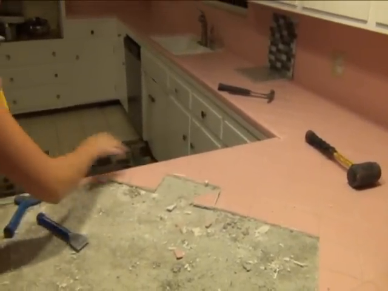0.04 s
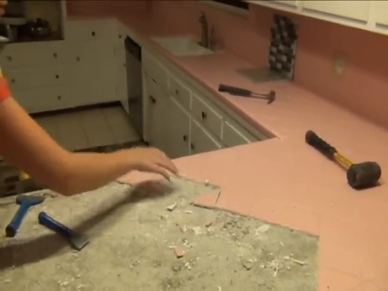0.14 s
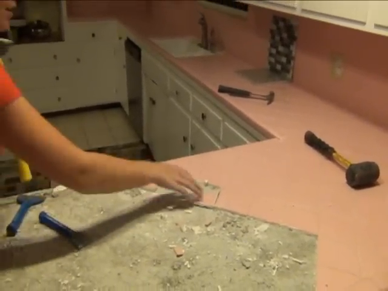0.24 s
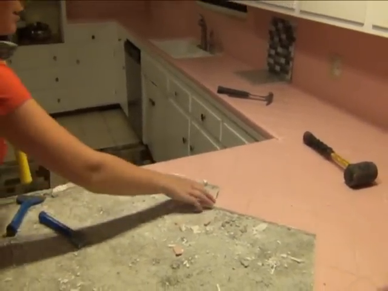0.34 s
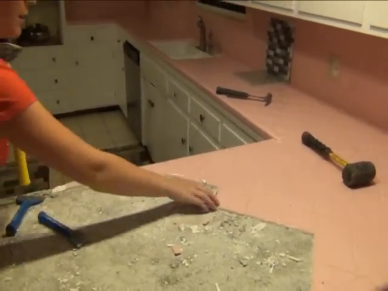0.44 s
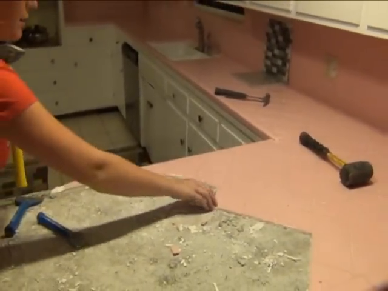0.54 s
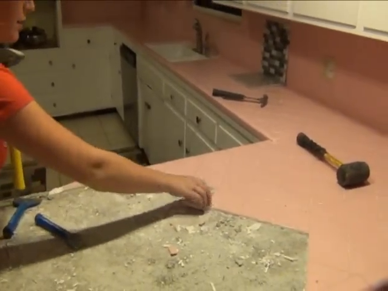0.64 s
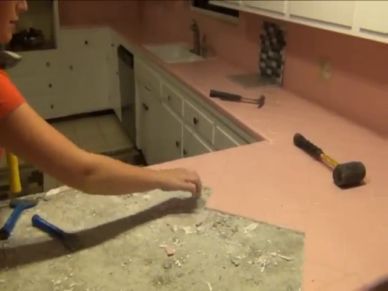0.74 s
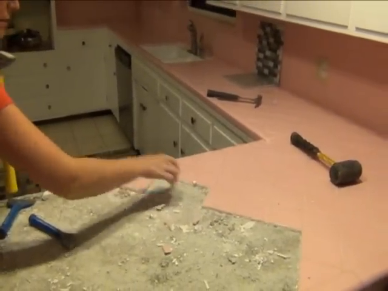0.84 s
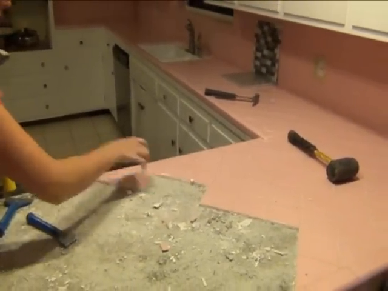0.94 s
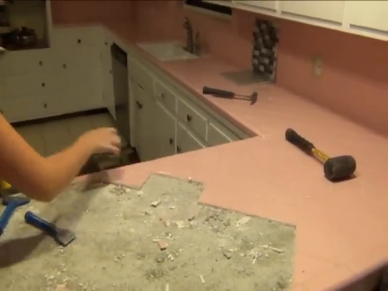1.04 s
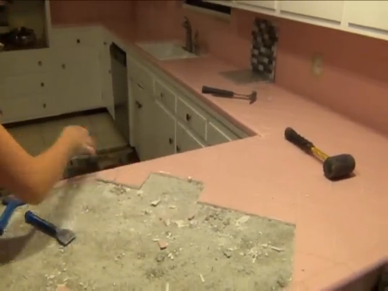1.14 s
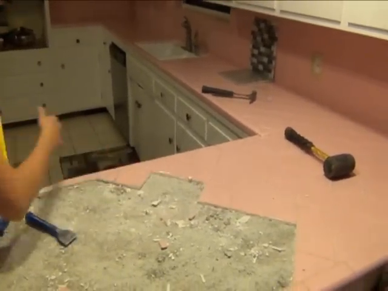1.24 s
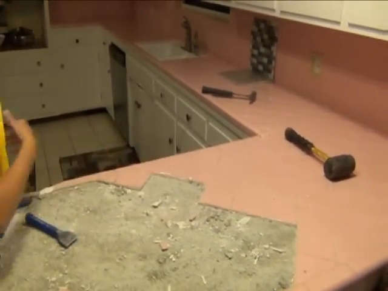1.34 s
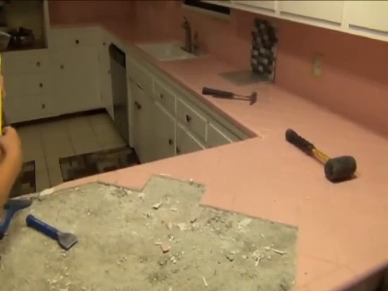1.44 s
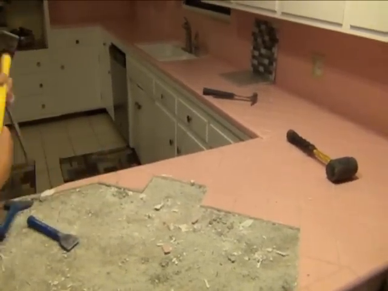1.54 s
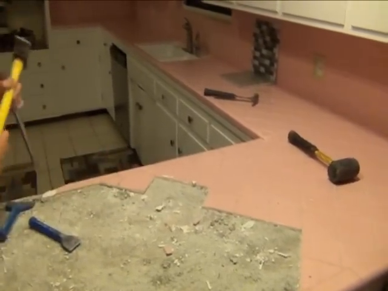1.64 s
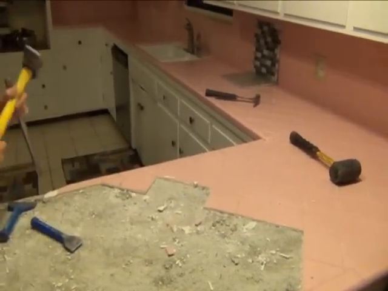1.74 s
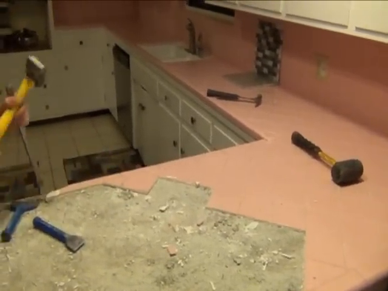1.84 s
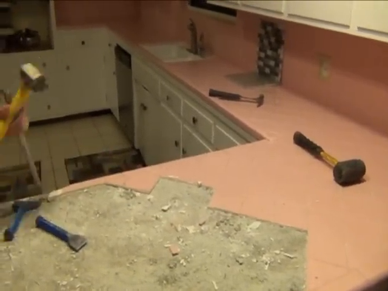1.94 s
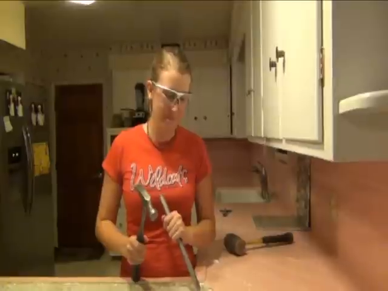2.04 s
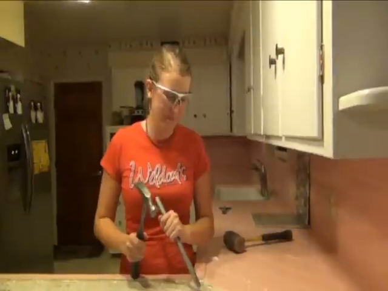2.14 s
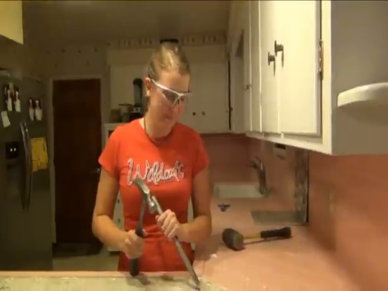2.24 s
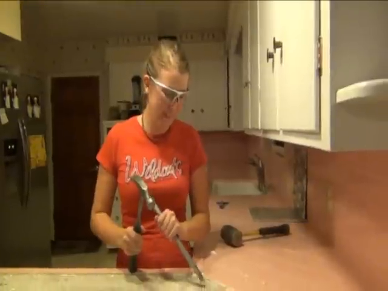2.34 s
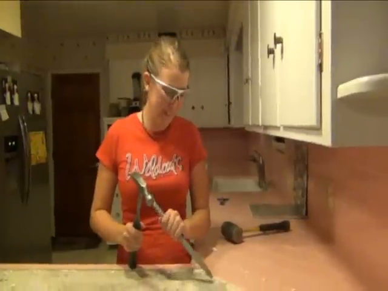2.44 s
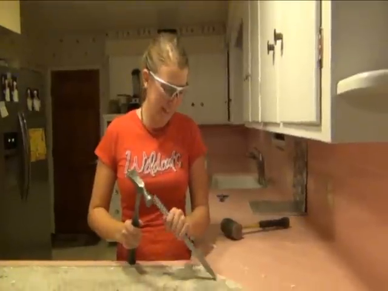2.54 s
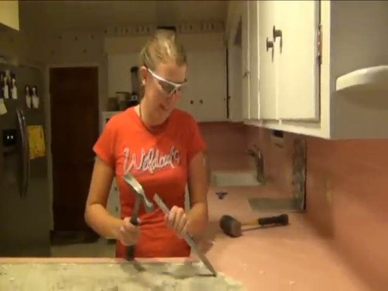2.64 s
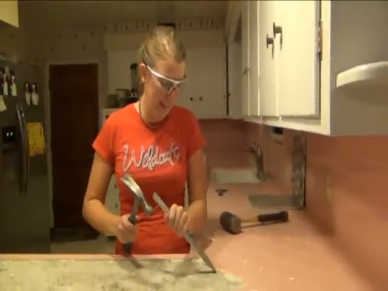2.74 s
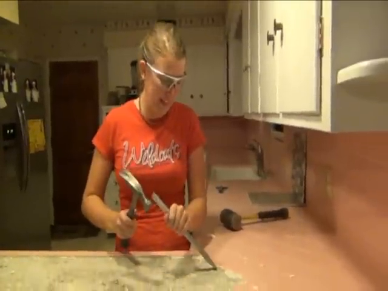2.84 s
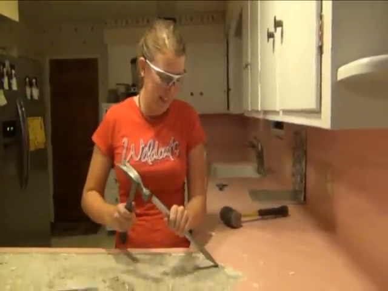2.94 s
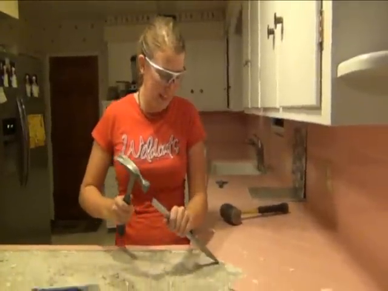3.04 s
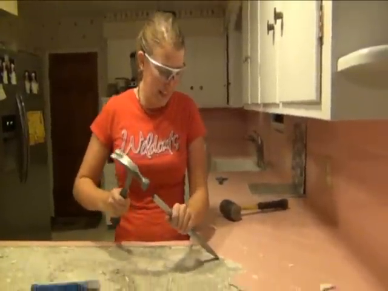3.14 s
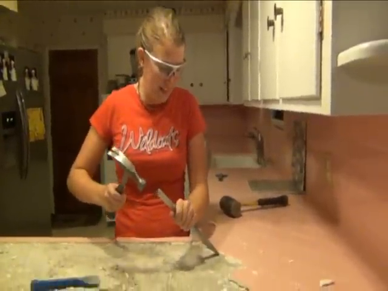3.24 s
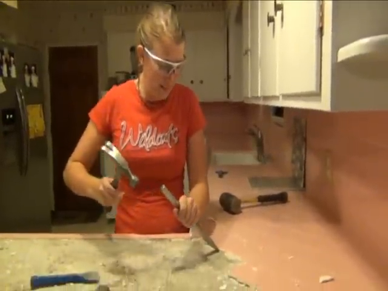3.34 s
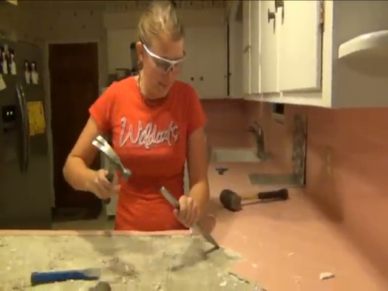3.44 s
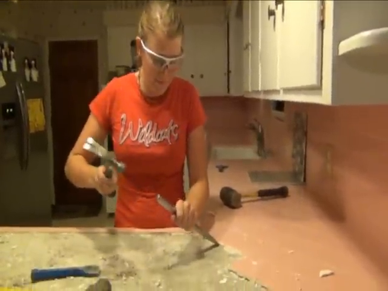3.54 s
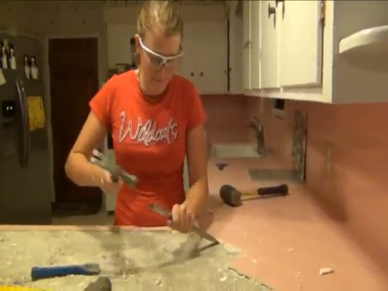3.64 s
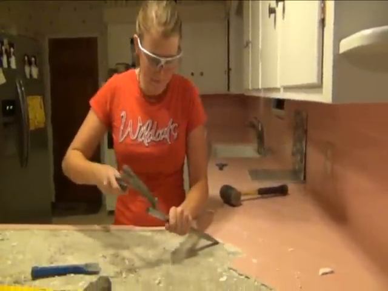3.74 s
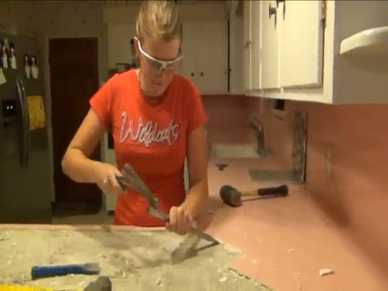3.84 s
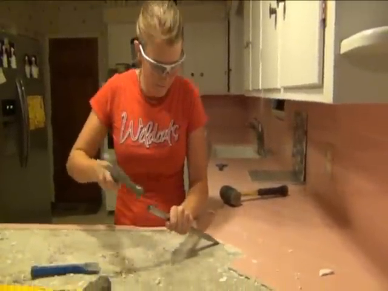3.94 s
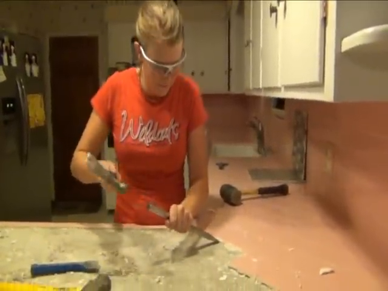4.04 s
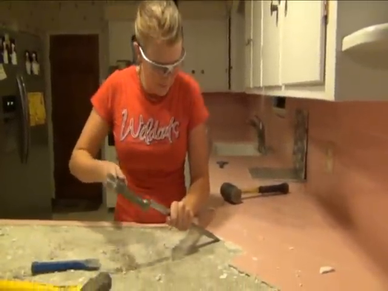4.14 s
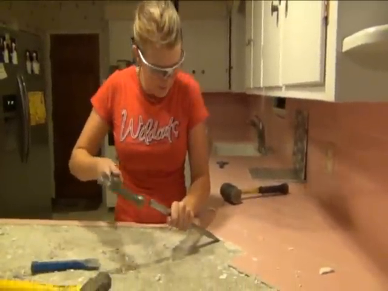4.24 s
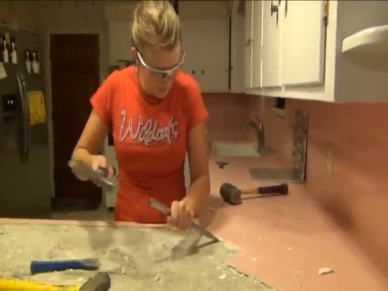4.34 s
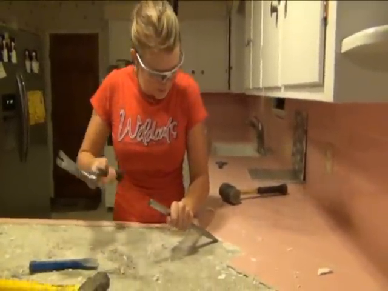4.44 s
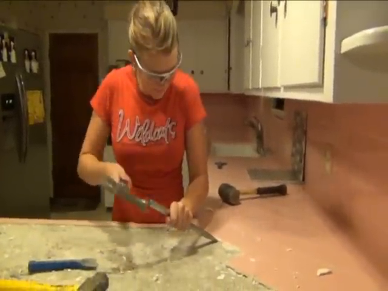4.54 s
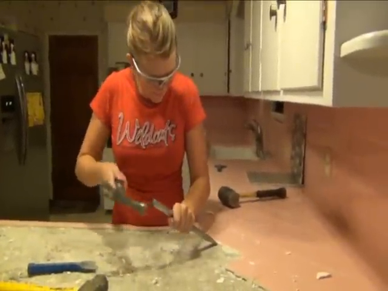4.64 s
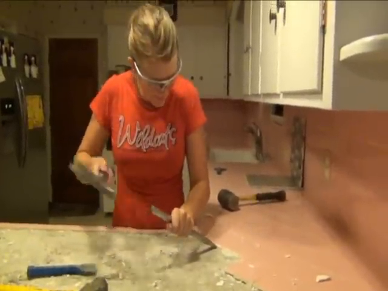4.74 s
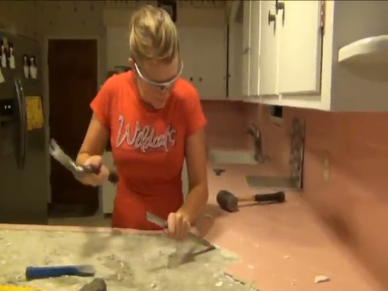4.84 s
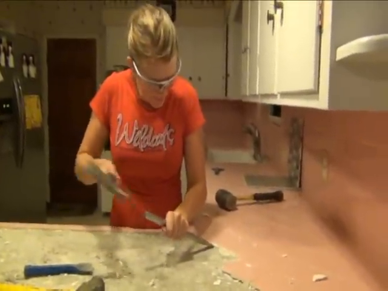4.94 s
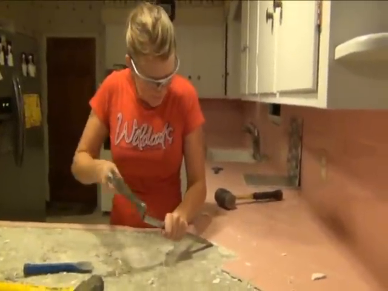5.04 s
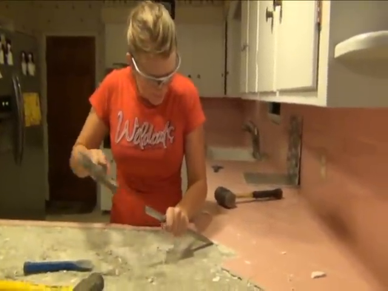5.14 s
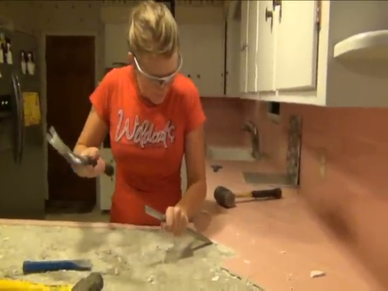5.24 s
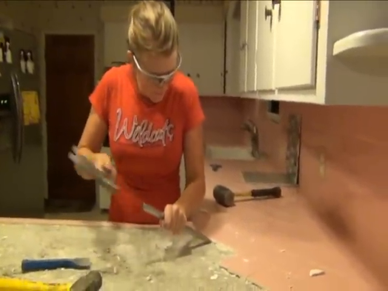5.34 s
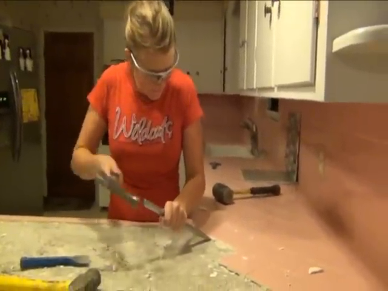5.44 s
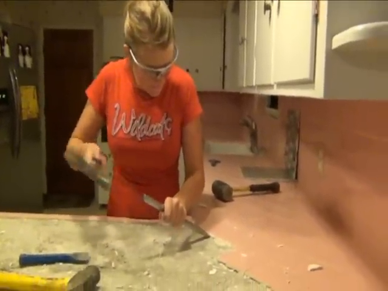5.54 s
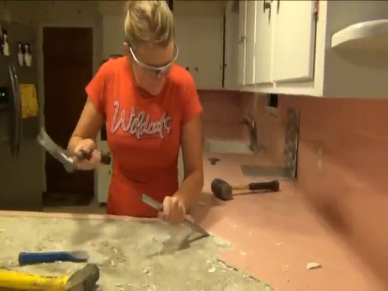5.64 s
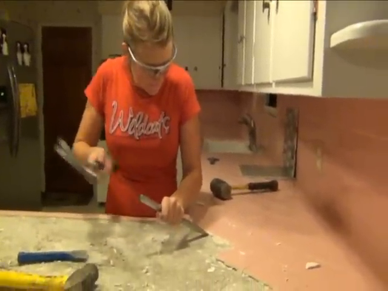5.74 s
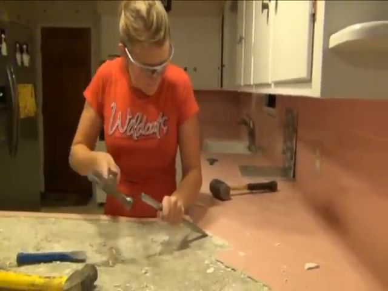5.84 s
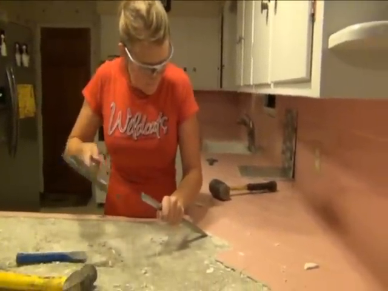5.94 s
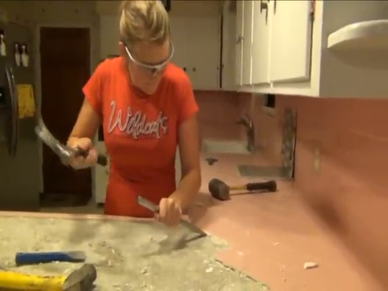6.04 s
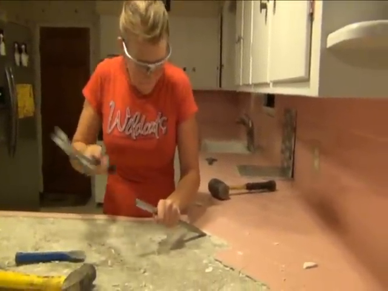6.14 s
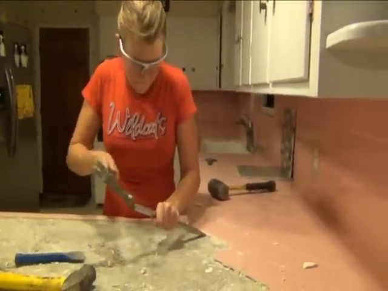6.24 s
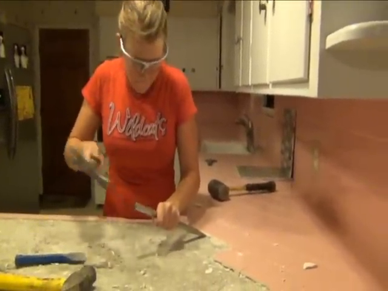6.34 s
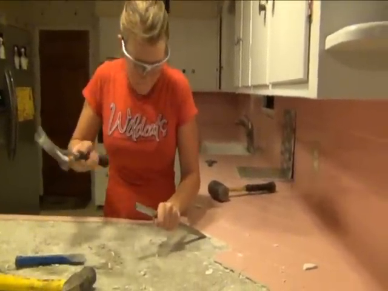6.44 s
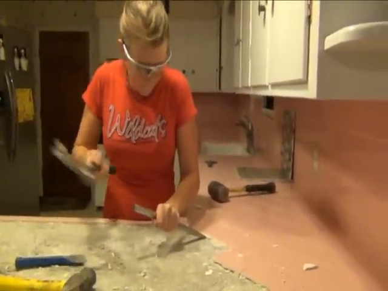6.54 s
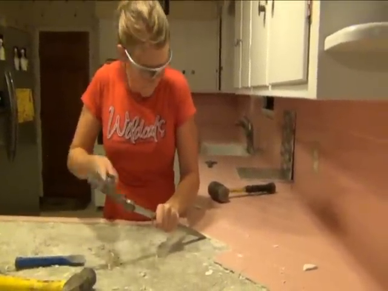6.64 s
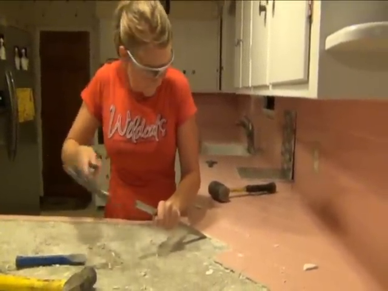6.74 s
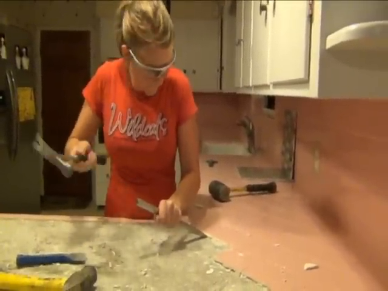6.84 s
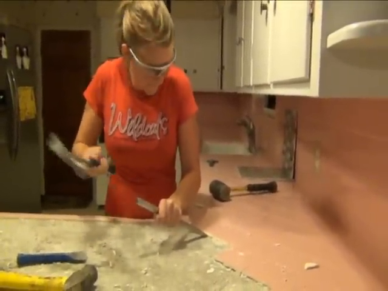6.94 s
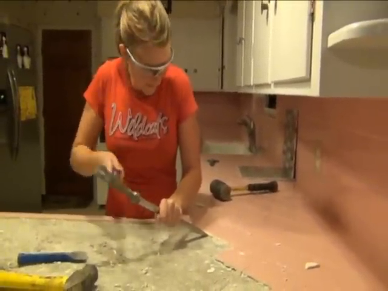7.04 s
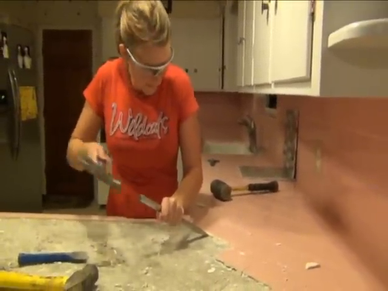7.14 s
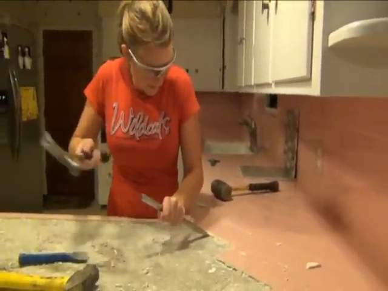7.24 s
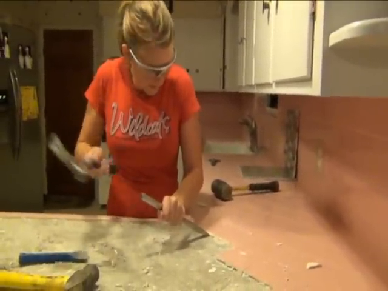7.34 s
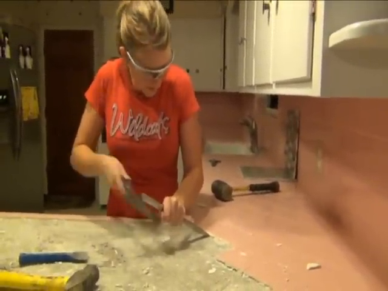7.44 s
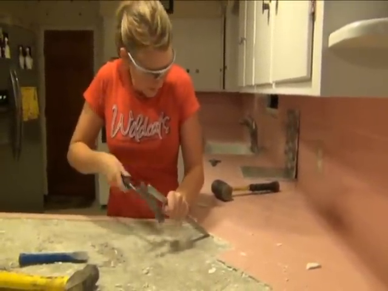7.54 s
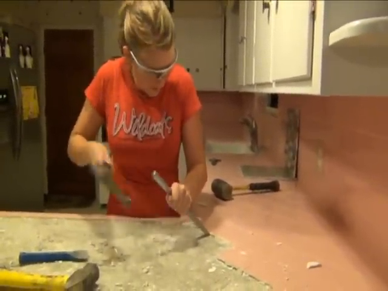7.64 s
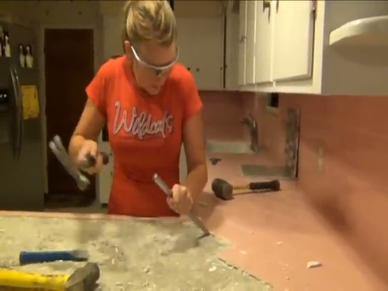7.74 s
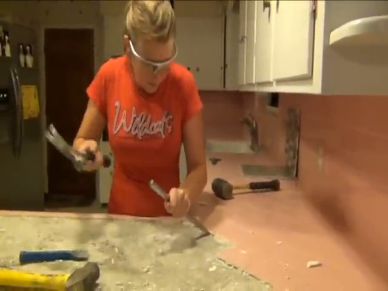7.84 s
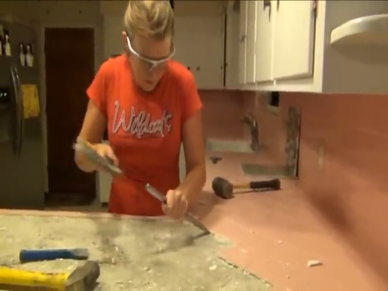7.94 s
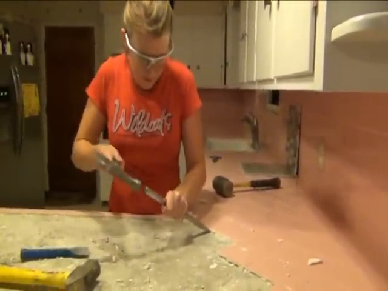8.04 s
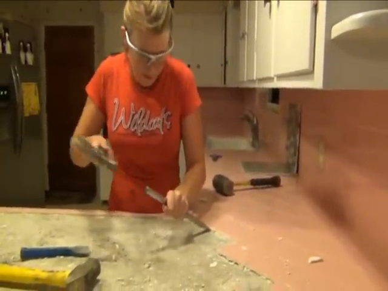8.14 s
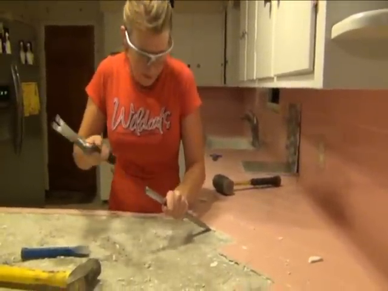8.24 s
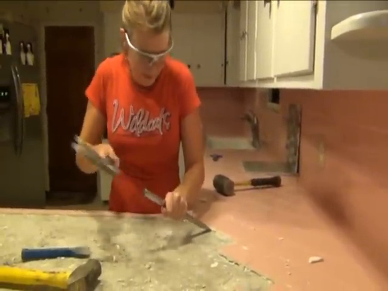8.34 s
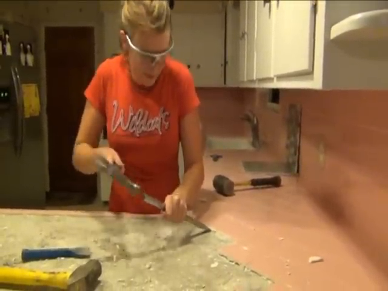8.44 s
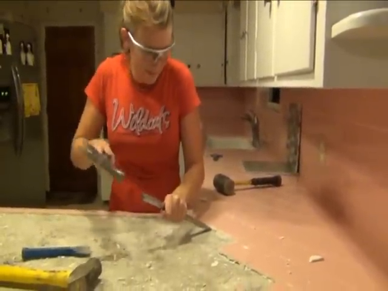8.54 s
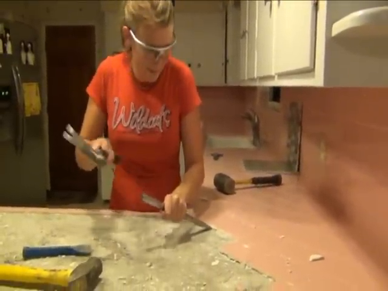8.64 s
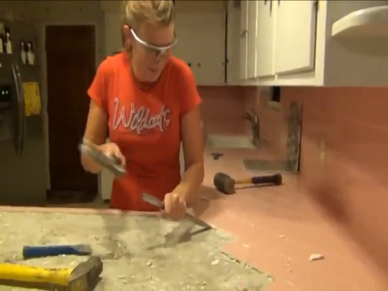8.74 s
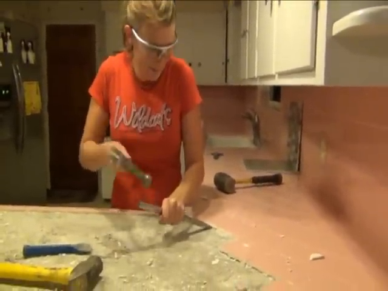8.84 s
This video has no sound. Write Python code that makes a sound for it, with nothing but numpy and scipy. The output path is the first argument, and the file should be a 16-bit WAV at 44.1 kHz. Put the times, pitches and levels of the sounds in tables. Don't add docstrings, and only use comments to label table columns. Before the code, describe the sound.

A small hard-walled kitchen with steady hum and hiss, grit settling at the start. At 0.4 s a tile shard lands with a loud bright ceramic clack and short room roar; faint clinks follow around 0.75-0.95 s, then a second, fuller smack at 1.7 s, with a tiny rocking tick at 2.0. At 2.1 s the background abruptly changes to a lower, darker hum. A chisel tip knocks the counter dully at 2.7 s, with faint steely touches and hand rustle until 3.7, then a firm tap at 3.9 and a softer rebound. From 4.3 s a hammer strikes the chisel about every 0.4 s, loud and compressed: early blows ring high over a counter thud and hollow cabinet boom; from 6.4 s they are choked and duller. A weaker glancing double hit comes at 7.6 s, then two last deadened blows at 8.2 and 8.55 s, reverberation dying away.

```python
import sys
import numpy as np
from scipy import signal
from scipy.io import wavfile
from scipy.ndimage import uniform_filter1d

SR = 44100
rng = np.random.default_rng(int(sys.argv[2]) if len(sys.argv) > 2 else 0)


def how_loud(loudness_db):
    steps = np.asarray(loudness_db, float) / 20
    return 10 ** steps


def log_audio(samples):
    frames = np.atleast_2d(samples).T
    limited = np.clip(frames, -1, 1)
    pcm = np.round(limited * 32767).astype(np.int16)
    wavfile.write(sys.argv[1], SR, pcm)


N = 392049
CHANGE_S = 2.103

# frequency in Hz, level in dB per Hz.
HUM_BEFORE = [(12, -58.5), (20, -22), (170, -7), (190, -4), (384, -10.5), (416, -4), (517, -11.5),
              (1100, -17.5), (2630, -28.5), (2850, -27.5), (6780, -33), (12000, -32), (13000, -30)]
HUM_AFTER = [(12, -63), (20, -47), (48, -4.5), (96, -10), (149, 0.5), (185, -13), (285, -11.5),
             (439, -19.5), (531, -18.5), (819, -26.5), (1570, -30), (1800, -31), (3740, -41.5),
             (12000, -47), (13000, -59)]
# frequency in Hz, likeness from 0 to 1.
HUM_LIKENESS = [(60, 1), (230, 1), (870, 0.77), (3320, 0.89), (12600, 1)]
# start in seconds, end in seconds, ease in seconds.
PLACING = (3.2, 5.5, 0.43)
# frequency in Hz, t60 in seconds.
KITCHEN_DECAY = [(100, 0.65), (300, 0.5), (1000, 0.46), (3000, 0.48), (6000, 0.43), (12000, 0.3)]
# frequency in Hz, likeness from 0 to 1.
ROOM_LIKENESS = [(60, 0.98), (170, 1), (510, 0.82), (1490, 0.85), (3000, 0.75), (4500, 1), (9000, 1),
                 (12600, 1)]

# start in seconds, force in dB, brightness in dB per octave, ring in dB.
TOSS = [
    (.001, -53.5, 2.5, -14.5),
    (.37, -1.5, 0.66, -0.8),
]
# frequency in Hz, level in dB per Hz.
TOSS_COLOUR = [(65, -46.5), (110, -27), (625, -22.5), (913, -22.5), (2070, -9), (2290, -16), (2910, -9.5),
               (3700, -22.5), (4340, -10.5), (6210, -26.5), (7290, -15.5), (12000, -29.5), (13000, -53)]
# frequency in Hz, level in dB, t60 in seconds.
TOSS_RING = [(2130.5, 5.5, 0.14), (2820, -11.5, .03), (2970, -7, .05), (4110, -6, .04), (4370, 0, 0.035),
             (4440, -9, .06), (5260, -2, 0.042), (7343, -9, .04), (7400, -16, .05), (8100, -14, 0.045),
             (8340, -10, .06), (9300, -19.5, .04), (11700, -11.5, 0.07)]
TOSS_BODY = [(1400, -6, .2), (1820, 8, 0.15)]
# start in seconds, force in dB, brightness in dB per octave, ring in dB.
CLINKS = [
    (.735, -48.5, -3, -15),
    (.815, -45, -4.5, -4),
    (.84, -41.5, -4.5, -2),
    (.866, -40, 6, -14),
    (.886, -36, -0.5, -4),
    (.905, -41, -0.5, -1),
    (.93, -48, -5, -4),
]
# frequency in Hz, level in dB, t60 in seconds.
CLINK_RING = [(3149, 0, .09), (5030, -4, .13), (7650, -6, .05), (11000, -12, .05)]
# start in seconds, force in dB, brightness in dB per octave, ring in dB, thud in dB.
SHARD = [
    (1.702, -21, -9, -10, 9),
    (1.717, -2.01, 4, 5, 0),
    (2.037, -36, 0.5, -15, -8),
]
# frequency in Hz, level in dB per Hz.
SHARD_COLOUR = [(47, -51), (80, -35), (120, -7), (500, -3.5), (2130, 0), (2870, -2.5), (3120, 1.5),
                (3860, -9.5), (5090, -4.5), (6300, -16), (7630, -7.5), (12200, -33), (13000, -16)]
# frequency in Hz, level in dB, t60 in seconds.
SHARD_RING = [(2400, -8.5, .05), (3130, -4, 0.086), (4150, -7.5, 0.094), (4390, -7, 0.049),
              (5067, -3.5, 0.063), (6660, -17, 0.037), (7500, -2.5, .03), (7820, -2.5, 0.046),
              (10900, -12.5, 0.047), (11800, -10.5, .03)]
SHARD_BODY = [(200, -4, 0.021), (460, -8, 0.036), (743, -4, 0.035), (1603, -2, 0.093)]
# start in
# seconds, level in dB, pitch in Hz, t60 in seconds.
TICKS = [(1.055, -66, 7950, 0.0018), (1.28, -66, 7650, 0.17), (0.867, -45.5, 10900, 0.0066),
         (1.635, -63, 7950, 0.00099), (1.94, -36.5, 10300, 0.014), (2.125, -62, 5840, 0.03),
         (2.686, -51, 8000, 0.00041), (2.71, -77, 8000, 0.0014), (4.177, -45.5, 5850, 0.00055),
         (4.199, -52.5, 9020, 0.00062), (4.22, -59.5, 9500, 0.0012), (.001, -51.5, 1400, 0.059),
         (3.873, -26, 2700, 0.0074), (4.012, -30, 2560, .012), (3.716, -55, 8870, .1),
         (7.88, -68, 7500, .006), (7.881, -65.5, 10600, 0.0051), (7.935, -73, 7540, 0.007),
         (7.95, -77, 10800, .008)]

# start in seconds, force in dB, brightness in dB per octave, steel ring in dB.
SETS = [(2.666, -19, -5, -4.5), (2.771, -34, -1.7, 3), (2.812, -39.5, -0.3, 1), (3.052, -51, 2, 15),
        (3.078, -43.9, 2, 11), (3.162, -51, 7, 14), (3.39, -51.9, 2, 3), (3.475, -51, 2.5, 3),
        (3.57, -49, -6, -9), (3.68, -49, 2.5, 10), (3.716, -25, 2.4, -12)]
# frequency in Hz, level in dB per Hz.
SET_COLOUR = [(65, -24), (110, -14), (317, -7), (704, -5), (1030, -14), (4600, -29.5), (5190, -38),
              (10600, -36), (12000, -43), (13000, -87)]
# frequency in Hz, level in dB, t60 in seconds.
SET_STEEL = [(4520, 0, .06), (7170, -1, .07), (7450, -5, .04), (10130, -2, .06), (10750, -6, .04),
             (8870, -10, .08), (2420, -2, .05)]
SET_WOOD = [(338, 14, 0.06), (517, 9, 0.042), (700, 2, 0.035), (870, -22, .025), (1310, -3, .02)]
# start in seconds, force in dB, brightness in dB per octave, steel ring in dB.
TAPS = [
    (3.873, -19.5, 0, 2),
    (4.009, -27.5, -3, -10.1),
]
# frequency in Hz, level in dB per Hz.
TAP_COLOUR = [(65, -43), (110, -15.5), (512, -2), (589, -8), (1070, -2), (1390, -8.5), (2430, -18.5),
              (3920, -13.5), (4600, -13.5), (10400, -27), (13000, -101)]
# frequency in Hz, level in dB, t60 in seconds.
TAP_STEEL = [(2519, -2, .035), (4592, 0, .04), (4938, -3, .12), (7165, -7, .04), (8866, -20, .06),
             (9205, -22, .06), (10150, -14, .03)]
TAP_WOOD = [(513.5, -3.5, 0.094), (923, -3, .03), (1400, -8.5, 0.033)]
# start in seconds, force in dB, steel ring in dB.
BLOWS = [
    (4.29, -8, 10),
    (4.706, -5.5, 7.5),
    (5.136, -5.5, 4.5),
    (5.544, -5, -5.5),
    (5.959, -5, 5),
    (6.365, -7.5, -10.5),
    (6.759, -7.5, -10.5),
    (7.168, -7.5, -12),
    (8.157, -10, -9.5),
    (8.551, -9, -21),
]
# frequency in Hz, level in dB per Hz.
BLOW_COLOUR = [(65, -46), (110, -21), (140, -7), (226, -24.5), (299, -8.5), (502, -11), (704, -1.5),
               (2530, -16), (5090, -21.5), (5400, -22.5), (11100, -27.5), (12300, -39.5), (13000, -117)]
# frequency in Hz, level in dB, t60 in seconds.
STEEL = [(4934, -1, .17), (4958, 0, .25), (4300, -10, .03), (9195, -7, .12)]
COUNTER = [(593, 3, 0.02), (712, 3.5, 0.054), (810, 10, 0.024), (952, 0.5, 0.044), (1100, -8, .03),
           (1400, 0, 0.03)]
HEAD = [(9200, -5, .06), (8870, -6, .07), (7500, -9, .025), (10400, -12, .025)]
# start in seconds, force in dB, brightness in dB per octave, steel ring in dB.
GLANCE = [
    (7.573, -20.5, 2.5, -17),
    (7.6, -23, 1.5, -15),
]
# frequency in Hz, level in dB per Hz.
GLANCE_COLOUR = [(65, -27), (110, -5.5), (492, -3.5), (704, 1), (1280, -1.5), (1470, 4.5), (1630, -6),
                 (2970, -2.5), (3770, -12.5), (4790, -7.5), (6340, -14), (10900, -15.5), (13000, -41)]
# frequency in Hz, level in dB, t60 in seconds.
LOW_BOOM = [(149.3, -8, 0.66), (298.4, 0, 0.4), (430, -0.5, 0.37)]

HUM_BEFORE_DB, HUM_AFTER_DB = -52, -41
FADE_IN_DB, FADE_IN_S = -22, 0.018
RUSTLE_REST_DB, RUSTLE_BUSY_DB = 1.8, 4.3
SETTLE_DB, SETTLE_S = 9, 0.12
PULL_SHARE, PULL_FROM_DB, PULL_S, CREEP_DB_PER_S = 0.46, -13, 0.31, 4.5
BITE_S = 0.97
LOOSE_TILT_DB, SEATED_TILT_DB = 3.5, 0.64
LOOSE_BOOM_DB, SEATED_BOOM_DB = 6, -0.6
SET_BOOM_DB, SET_BOOM_PER_RING = -3.5, -0.65
LOW_BOOM_DB, LOW_BOOM_RISE_S, LOW_BOOM_WAVER = -17.5, 0.023, 0.39


def evened(x):
    return x / np.sqrt(np.mean(x ** 2) + 1e-20)


def read(points, hz):
    f, value = np.transpose(points)
    return np.interp(np.log(hz + 1), np.log(f + 1), value)


def add(mix, s, sound):
    part = mix[:, round(s * SR):][:, :sound.shape[1]]
    part += sound[:, :part.shape[1]]


def noise(field_db, likeness, size):
    a, b, c, d = rng.standard_normal((4,) + field_db.shape)
    same = np.clip(read(likeness, np.fft.rfftfreq(size, 1 / SR)), -1, 1)[:, None]
    left = a + 1j * b
    right = same * left + np.sqrt(1 - same ** 2) * (c + 1j * d)
    spectrum = np.array([left, right]) * how_loud(field_db)
    return signal.istft(spectrum, nperseg=size, noverlap=size * 3 // 4)[1]


def slow_gain(rows, time):
    drift = CREEP_DB_PER_S * time
    for s, db, *_ in rows:
        drift = drift - PULL_SHARE * max(db - PULL_FROM_DB, 0) * np.clip((time - s) / PULL_S, 0, 1)
    return drift - np.maximum.accumulate(drift)


def hum():
    hz = np.fft.rfftfreq(2048, 1 / SR)
    t = np.arange(N // 512 + 5) * 512 / SR
    patches = uniform_filter1d(rng.standard_normal((len(hz), len(t))), 9, 0)
    patches = evened(uniform_filter1d(patches, 7, 1))
    upper = 1 / (1 + (1000 / (hz + 1)) ** 2)
    start, end, ease = PLACING
    busy = np.clip(np.minimum(t - start, end - t) / ease + 1, 0, 1)
    rustle_db = RUSTLE_REST_DB + (RUSTLE_BUSY_DB - RUSTLE_REST_DB) * busy
    rustle_db += SETTLE_DB * np.exp(-t / SETTLE_S)
    field_db = 1.1 * patches + upper[:, None] * rustle_db

    def coloured(colour):
        return evened(noise(read(colour, hz)[:, None] + field_db, HUM_LIKENESS, size=2048)[:, :N])

    time = np.arange(N) / SR
    before = coloured(HUM_BEFORE) * how_loud(HUM_BEFORE_DB + slow_gain(TOSS, time))
    fade_in_db = FADE_IN_DB * np.clip(1 - (time - CHANGE_S) / FADE_IN_S, 0, 1)
    after = coloured(HUM_AFTER) * how_loud(HUM_AFTER_DB + fade_in_db + slow_gain(BLOWS, time))
    return np.where(time < CHANGE_S, before, after)


def reverb(rise_s, early_db):
    hz = np.fft.rfftfreq(512, 1 / SR)
    t = np.arange(240) * 128 / SR
    tail = noise(-60 * t / read(KITCHEN_DECAY, hz)[:, None], ROOM_LIKENESS, size=512)
    time = np.arange(tail.shape[1]) / SR
    tail *= 1 - np.exp(-time / rise_s)
    tail *= 1 + how_loud(early_db) * np.exp(-time / 0.02)
    return tail / np.linalg.norm(tail[0])


def heard(source, near, db, rise_s, early_db):
    wet = signal.fftconvolve(source[None], reverb(rise_s, early_db), axes=1)
    wet[:, :len(near)] += near
    return how_loud(db) * wet / np.sqrt(np.mean(wet[:, :SR // 20] ** 2))


def crack(colour, tilt_db):
    hz = abs(np.fft.fftfreq(2048, 1 / SR))
    level_db = read(colour, hz) + tilt_db * np.log2((hz + 100) / 2000)
    log_gain = np.log(how_loud(np.maximum(level_db, -90)))
    click = np.fft.ifft(np.exp(np.conj(signal.hilbert(log_gain)))).real
    return click / np.linalg.norm(click)


def ring(modes):
    hz, db, t60 = np.transpose(modes)[..., None]
    t = np.arange(SR // 2) / SR
    level_luck, pitch_luck = rng.standard_normal((2, len(modes), 1))
    envelope = how_loud(db + 1.5 * level_luck - 60 * t / t60)
    tones = envelope * np.sin(2 * np.pi * hz * (1 + 0.001 * pitch_luck) * t)
    return tones.sum(0) / np.linalg.norm(how_loud(db) * np.sqrt(t60 * SR / 28))


def hits(rows, colour, high, low, high_db, low_db, rise_s, early_db, near_high_db, near_low_db):
    out = np.zeros((2, N))
    for s, db, tilt_db, ring_db, boom_db in rows:
        bright = how_loud(high_db + ring_db) * ring(high)
        body = how_loud(low_db + boom_db) * ring(low)
        source = bright + body
        source[:2048] += crack(colour, tilt_db)
        near = how_loud(near_high_db) * bright + how_loud(near_low_db) * body
        add(out, s, heard(source, near, db, rise_s, early_db))
    return out


def pressed(rows, boom_db, per_ring=0):
    return [(*row, boom_db + per_ring * row[3]) for row in rows]


def ticks(rows):
    out = np.zeros((2, N))
    for s, db, hz, t60 in rows:
        tick = ring([(hz, 0, t60)])
        add(out, s, heard(tick, how_loud(-5.5) * tick, db, rise_s=0.0005, early_db=5.7))
    return out


def tile_shards():
    out = hits(pressed(TOSS, 0), TOSS_COLOUR, TOSS_RING, TOSS_BODY, high_db=-1.2, low_db=-17,
               rise_s=0.0044, early_db=-25, near_high_db=-25.5, near_low_db=-20)
    out += hits(pressed(CLINKS, -5.5), SHARD_COLOUR, CLINK_RING, SHARD_BODY, high_db=1.8, low_db=-8.5,
                rise_s=0.0031, early_db=3.6, near_high_db=1.8, near_low_db=-16)
    out += hits(SHARD, SHARD_COLOUR, SHARD_RING, SHARD_BODY, high_db=-6.5, low_db=-15,
                rise_s=0.0012, early_db=-26.5, near_high_db=-28, near_low_db=-6)
    return out


def chisel_placing():
    sets = pressed(SETS, SET_BOOM_DB, SET_BOOM_PER_RING)
    out = hits(sets, SET_COLOUR, SET_STEEL, SET_WOOD, high_db=-19, low_db=-1.5,
               rise_s=0.0015, early_db=3.7, near_high_db=-14, near_low_db=1.3)
    out += hits(pressed(TAPS, 0), TAP_COLOUR, TAP_STEEL, TAP_WOOD, high_db=-0.84, low_db=-2,
                rise_s=0.0008, early_db=1.4, near_high_db=-3.5, near_low_db=-5)
    return out


def driven(rows):
    s, db, ring_db = np.transpose(rows)
    loose = np.exp(-(s - s[0]) / BITE_S)
    tilt_db = SEATED_TILT_DB + (LOOSE_TILT_DB - SEATED_TILT_DB) * loose
    boom_db = SEATED_BOOM_DB + (LOOSE_BOOM_DB - SEATED_BOOM_DB) * loose
    return np.transpose([s, db, tilt_db, ring_db, boom_db])


def hammer_blows():
    out = hits(driven(BLOWS), BLOW_COLOUR, STEEL, COUNTER + HEAD, high_db=-14.5, low_db=-9.5,
               rise_s=0.00044, early_db=-21.5, near_high_db=-1.3, near_low_db=-15.5)
    out += hits(pressed(GLANCE, -10.5), GLANCE_COLOUR, STEEL, COUNTER + HEAD, high_db=-5, low_db=-8.5,
                rise_s=0.00027, early_db=-12, near_high_db=-4, near_low_db=-10)
    return out


def low_boom(rows):
    out = np.zeros((2, N))
    t = np.arange(SR // 2) / SR
    for s, db, _, _, boom_db in rows:
        drift_noise = uniform_filter1d(rng.standard_normal(len(t)), size=900)
        waver = 1 + LOW_BOOM_WAVER * evened(uniform_filter1d(drift_noise, size=900))
        boom = ring(LOW_BOOM) * (1 - np.exp(-t / LOW_BOOM_RISE_S)) * waver
        boom *= how_loud(db + boom_db + LOW_BOOM_DB) / np.sqrt(np.mean(boom[:SR // 10] ** 2))
        add(out, s, np.tile(boom, (2, 1)))
    return out


def scene():
    shards = tile_shards() + ticks([row for row in TICKS if row[0] < CHANGE_S])
    shards *= np.clip((CHANGE_S - np.arange(N) / SR) / 0.013, 0, 1)
    chisel = chisel_placing() + hammer_blows() + low_boom(driven(BLOWS))
    chisel += ticks([row for row in TICKS if row[0] > CHANGE_S])
    no_bass = signal.butter(4, 85, "high", fs=SR, output="sos")
    return signal.sosfilt(no_bass, shards + chisel) + hum()


def roll_off(x):
    return signal.sosfilt(signal.butter(12, 13230, fs=SR, output="sos"), x)


def record(dry):
    power_db = 10 * np.log10(abs(uniform_filter1d((dry ** 2).mean(0), size=260)) + 1e-12)
    recovery_db = np.arange(N) * 117.0 / SR
    held_db = np.maximum.accumulate(power_db + recovery_db) - recovery_db
    over_db = np.maximum(held_db + 12.5, 0)
    limited = dry / how_loud(1.194 * uniform_filter1d(over_db, size=60))
    soft = 1.245 * np.tanh(limited / 0.98)
    treble_limit = signal.firwin(401, 12100, window=("kaiser", 8), fs=SR)
    return roll_off(signal.oaconvolve(soft, treble_limit[None], "same", axes=1))


dry = scene()
out = record(dry)
log_audio(out)
```